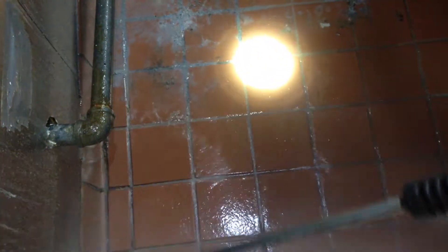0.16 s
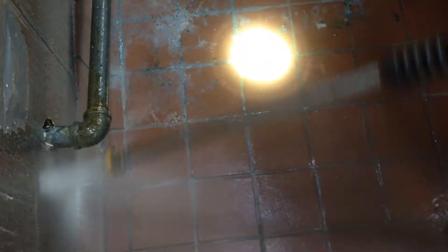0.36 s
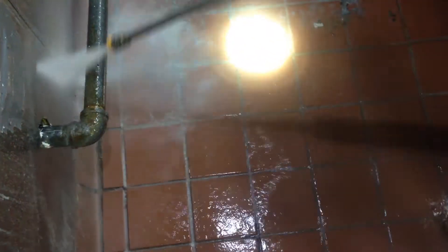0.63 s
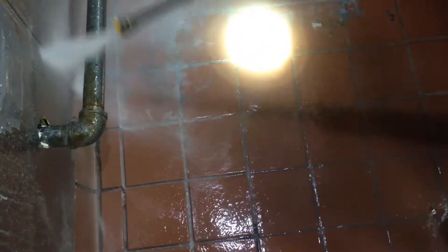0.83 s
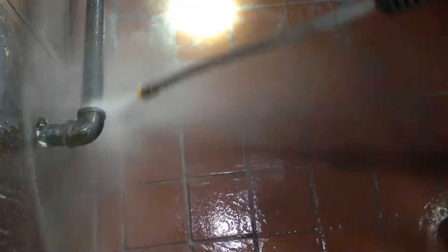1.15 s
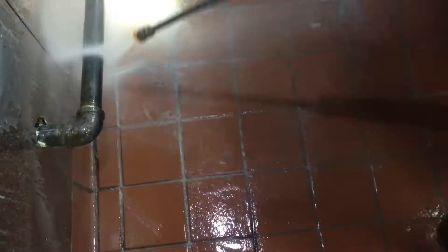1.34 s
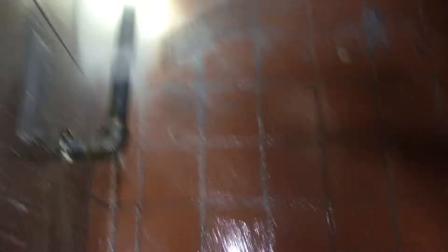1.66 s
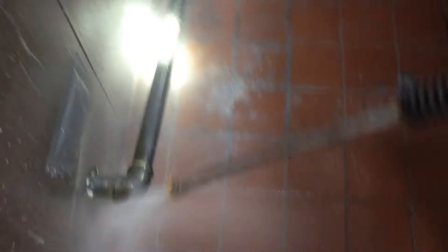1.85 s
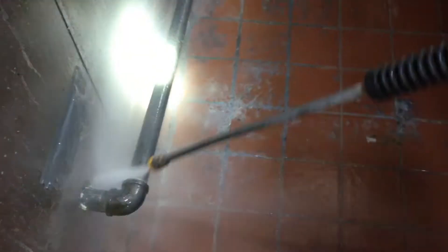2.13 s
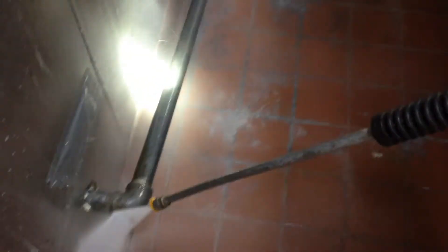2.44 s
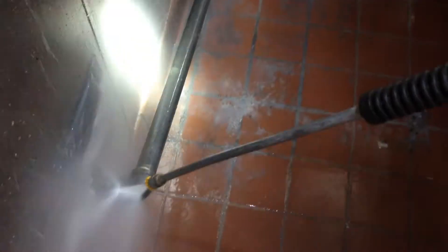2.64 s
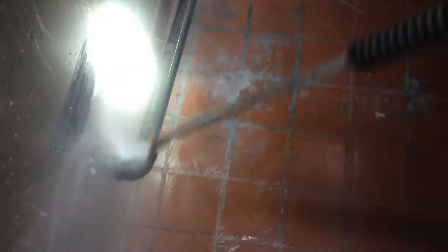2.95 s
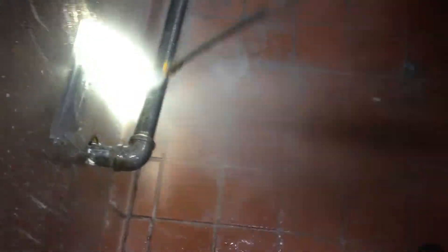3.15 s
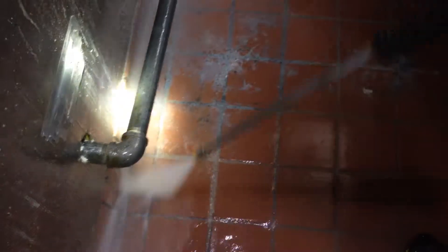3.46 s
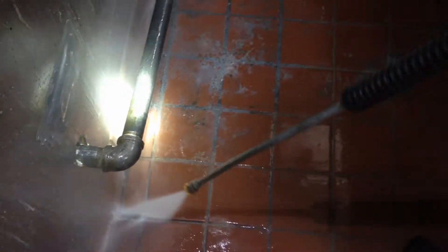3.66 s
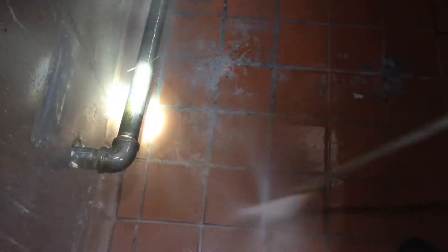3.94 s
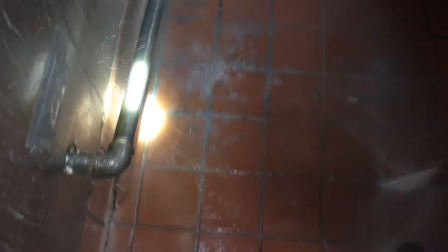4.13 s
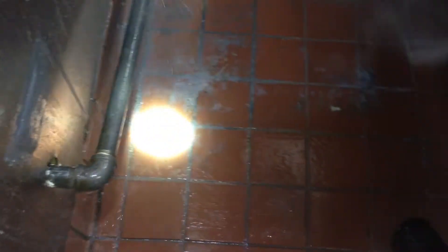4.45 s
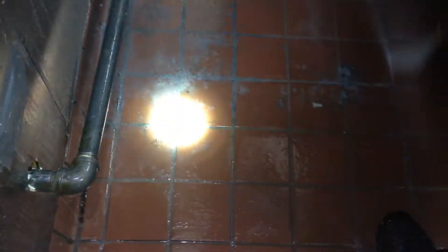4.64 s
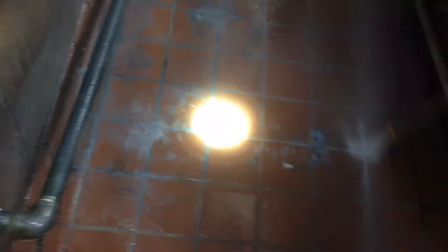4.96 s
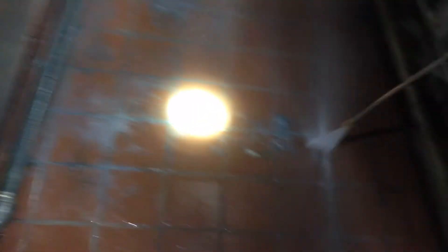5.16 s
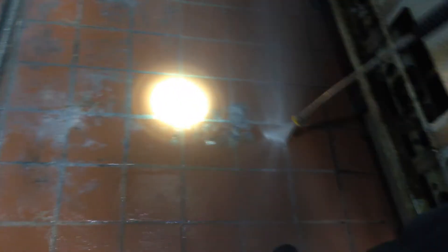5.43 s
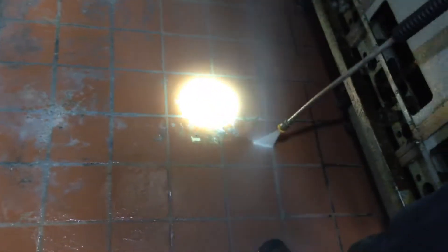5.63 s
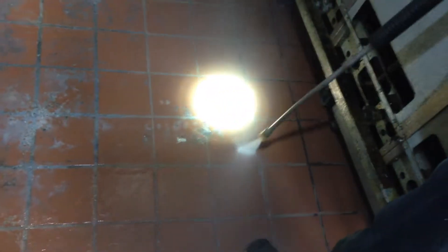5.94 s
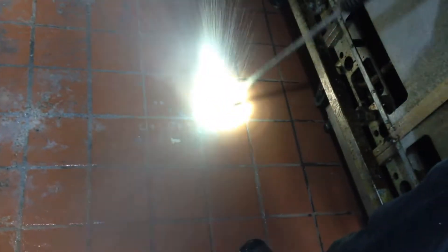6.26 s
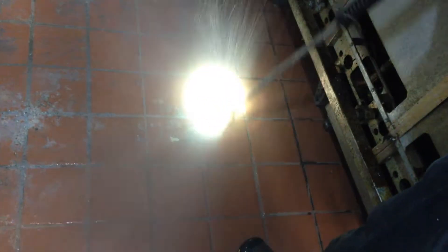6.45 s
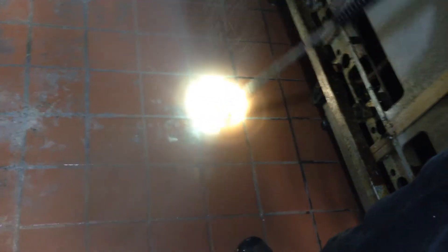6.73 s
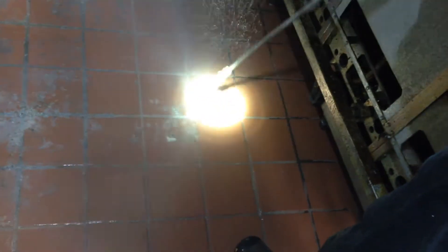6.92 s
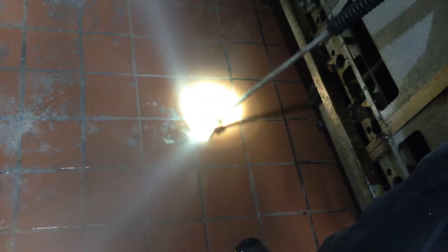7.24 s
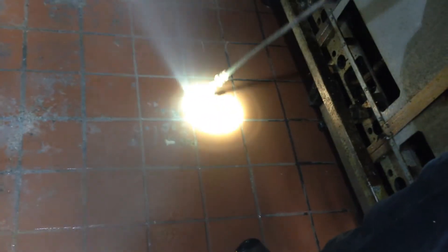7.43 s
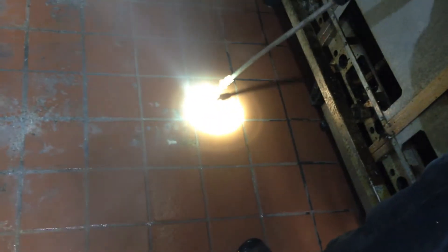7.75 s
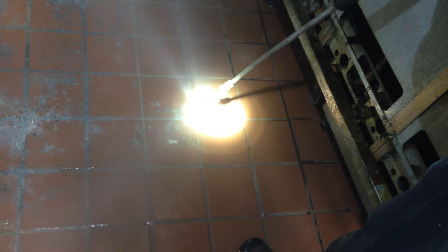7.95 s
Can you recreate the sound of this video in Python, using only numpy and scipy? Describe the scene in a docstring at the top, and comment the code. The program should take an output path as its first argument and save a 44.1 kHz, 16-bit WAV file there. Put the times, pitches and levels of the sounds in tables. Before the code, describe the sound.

A pressure washer jet roars and hisses into a steel-walled corner, then sweeps onto open tiles, thinner and hissier, over a faint motor hum.

```python
"""A fan jet from a pressure washer first digs into the corner at a steel wall: the impact roars and hisses,
the wall throws the hiss back a moment later, spray and mist sizzle on top, and a pump hums underneath.
Pitched bands of noise briefly swell within the jet, puffs of mist burst and gusts thud on the microphone.
Then it sweeps out on the open tiles: the roar sinks, the wall's echo comes later and the mist grows stronger.
The jet is flickering coloured noise with a sliding echo, in a hard room; both channels are the same."""
import sys
import numpy as np
from scipy import signal
from scipy.fft import rfft, irfft, next_fast_len
from scipy.io import wavfile
from scipy.ndimage import map_coordinates

SR = 44100
rng = np.random.default_rng(int(sys.argv[2]) if len(sys.argv) > 2 else 0)


def wav_record(signal):
    """Record a signal, one row per channel, as 16-bit PCM in the file named by sys.argv[1]."""
    frames = np.transpose(np.atleast_2d(signal))
    bounded = np.clip(frames, -1, 1)
    # unit amplitude maps onto the largest positive 16-bit level
    quanta = np.round(bounded * 32767).astype(np.int16)
    wavfile.write(sys.argv[1], SR, quanta)


N = 356769

SIZE = next_fast_len(N + SR)     # transform length, with a second or more to spare
HZ = np.maximum(np.arange(SIZE // 2 + 1) * SR / SIZE, 1)


def from_db(db):
    """Decibels to gain."""
    return 10 ** (np.asarray(db) / 20)


def rms_one(x):
    """Scale to rms 1."""
    return x / np.sqrt(np.mean(x ** 2) + 1e-20)


def in_time(rows):
    """Table columns as sample-by-sample curves."""
    s, *columns = np.transpose(rows)
    return [np.interp(np.arange(N) / SR, s, column) for column in columns]


def response(points):
    """A table of Hz and dB as gains on the frequency grid."""
    hz, db = np.transpose(points)
    return from_db(np.interp(np.log(HZ), np.log(hz), db))


def filtered(x, gains):
    """Apply gains on the frequency grid."""
    return irfft(rfft(x, SIZE) * gains, SIZE)[..., :N]


def drift(rate):
    """Slow random curve of rms about 1: coarse noise through a double one-pole low-pass at rate Hz."""
    step = 40                                # samples between the coarse points
    r = np.exp(-2 * np.pi * rate * step / SR)
    coarse = rng.standard_normal(N // step + 2002)
    slow = signal.lfilter([1], [1, -2 * r, r * r], coarse)[2000:]     # skip the filter's start
    return np.interp(np.arange(N) / step, np.arange(len(slow)), rms_one(slow))


def turbulence(spectrum, shared_db, patchy_db, rate):
    """Broken water as coloured noise, in overlapping bands that flicker partly together, partly alone; rms 1."""
    hz = np.array(spectrum)[:, 0]
    inside = (HZ > hz[0]) & (HZ < hz[-1])
    noise = rfft(rng.standard_normal(SIZE)) * response(spectrum) * inside
    out, together = 0, shared_db * drift(rate)
    # band centres in octaves, half an octave apart
    for centre in np.arange(np.floor(np.log2(hz[0])), np.ceil(np.log2(hz[-1])) + .1, .5):
        band = np.clip(1 - 2 * np.abs(np.log2(HZ) - centre), 0, 1)      # triangles that sum to 1
        flicker_db = together + patchy_db * drift(rate)
        out = out + irfft(noise * band, SIZE)[:N] * from_db(flicker_db)
    return rms_one(out)


def water_sheet(roar_db, puff_db):
    """Low rumble of the water sheet, which follows part of the roar's swing and is stirred by each puff."""
    # Colour of the sheet. Each row: frequency in Hz, relative level in dB.
    sheet_colour = [(18, -32), (35, -7), (55, -5), (110, -1), (160, -4), (230, -7), (400, -20)]
    base_db, roar_share, puff_share = -41, 0.31, .4
    swing_db = roar_db - roar_db.mean()
    level_db = base_db + roar_share * swing_db + puff_share * puff_db
    return from_db(level_db) * turbulence(sheet_colour, shared_db=2.0, patchy_db=1.5, rate=5.1)


def impact_roar(roar_db, dip_db):
    """Low-mid roar of the jet's impact, swelling where it digs into the corner."""
    # Colour of the roar. Each row: frequency in Hz, relative level in dB.
    roar_colour = [(150, -24), (230, -11.5), (300, -5), (450, 0), (700, -4), (900, 1), (1300, -16),
                   (2000, -21)]
    level_db = roar_db + 0.93 * dip_db       # takes nearly all of each falter
    return from_db(level_db) * turbulence(roar_colour, shared_db=1.27, patchy_db=1.2, rate=15)


def impact_splash(splash_db, dip_db):
    """Mid-range splash that carries the force of the impact."""
    # Colour of the splash. Each row: frequency in Hz, relative level in dB.
    splash_colour = [(200, -13), (400, -23), (600, -4.5), (800, -1.5), (1500, 2), (2400, 3), (3000, -6),
                     (3800, -4.5)]
    return from_db(splash_db + dip_db) * turbulence(splash_colour, shared_db=1.05, patchy_db=1.08, rate=21)


def impact_hiss(hiss_db, dip_db):
    """Hiss of the impact, a band of upper-mid noise."""
    # Colour of the hiss. Each row: frequency in Hz, relative level in dB.
    hiss_colour = [(2000, -43), (2600, -1.5), (3200, 1), (4300, 2.5), (5000, -1.5), (6000, -15),
                   (7500, -51)]
    return from_db(hiss_db + dip_db) * turbulence(hiss_colour, shared_db=0.59, patchy_db=0.88, rate=14)


def flying_spray(spray_db, puff_db):
    """Sizzle of the spray in the treble, lifted a little by each puff."""
    # Colour of the spray. Each row: frequency in Hz, relative level in dB.
    spray_colour = [(4500, -10), (5500, 6), (6200, 2), (7500, 1.5), (9000, -4), (11000, -15)]
    level_db = spray_db + 0.32 * puff_db
    return from_db(level_db) * turbulence(spray_colour, shared_db=0.57, patchy_db=0.85, rate=27)


def fine_mist(mist_db, puff_db):
    """Airy top treble of the mist, which takes each puff in full."""
    # Colour of the mist. Each row: frequency in Hz, relative level in dB.
    mist_colour = [(8000, -11), (9800, -4.5), (12000, -5.5), (14000, -10), (15500, -9)]
    return from_db(mist_db + puff_db) * turbulence(mist_colour, shared_db=0.6, patchy_db=0.7, rate=13)


def off_the_wall(x):
    """Direct sound plus a late copy: a comb that slides as the jet leaves the wall."""
    # The wall's echo of the impact. Each row: time in seconds, extra path in ms, strength in dB.
    wall = [(0, 0.15, -21), (.8, 0.18, -16), (1.3, 0.17, -10.5), (1.8, 0.18, -10.5), (2.05, 0.15, -23),
            (2.8, 0.11, -22), (3.3, 0.15, -12), (3.7, 0.057, -35), (3.83, 0.13, -17), (3.96, 0.38, -8),
            (4.03, 0.53, -8), (4.26, 0.96, -11), (4.75, 1.01, -9.5), (6.05, 1.07, -14), (6.3, 1, -14),
            (7, 0.9, -10.5), (8.09, 0.95, -12)]
    wall_cut_hz, sharp_path_ms = 2600, 0.61
    path_ms, echo_db = in_time(wall)
    late = map_coordinates(x, [np.arange(N) - path_ms * SR / 1000], order=3, mode="nearest")
    dull = filtered(late, 1 / np.sqrt(1 + (HZ / wall_cut_hz) ** 4))
    sharp = np.exp(-(path_ms / sharp_path_ms) ** 2)      # away from the wall the wide fan blurs the echo's treble
    echo = from_db(echo_db)
    return (x + echo * (sharp * late + (1 - sharp) * dull)) / np.sqrt(1 + echo ** 2)


def room(x):
    """Short diffuse tails that take turns as the jet moves about; the standing waves lift their pitches."""
    # Standing waves of the room. Each row: frequency in Hz, width in Hz, lift in dB.
    room_modes = [(120, 33, 3), (150.6, 24, 4), (302.4, 16, 5.5), (420, 27, 2), (523, 22, 4.5),
                  (620, 17, 4), (832, 31, 3.5), (870, 17, 3), (939, 54, 1), (1043, 60, 1.5), (1400, 70, 1),
                  (1770, 22, 1), (2460, 42, 3)]
    t60_s, tail_db, damp_hz = 0.22, -8, 2800
    t = np.arange(SR // 2) / SR
    tails = rng.standard_normal((4, len(t))) * from_db(-60 * t / t60_s) * (t > .003)
    tails = tails / np.sqrt(np.sum(tails ** 2, axis=1, keepdims=True))
    turns = np.array([drift(0.66) for tail in tails])
    turns = turns / np.sqrt(np.sum(turns ** 2, axis=0))
    damp = from_db(tail_db) / np.sqrt(1 + (HZ / damp_hz) ** 2)      # damp air takes the treble off the tails
    heard = x + np.sum(filtered(x * turns, rfft(tails, SIZE) * damp), axis=0)
    lift_db = sum(db / (1 + (2 * (HZ - hz) / width) ** 2) for hz, width, db in room_modes)
    return filtered(heard, from_db(lift_db))


def pump():
    """Motor hum: slightly wavering partials, each roughened by noise close around it."""
    # Partials of the pump motor. Each row: frequency in Hz, rms level of the sine in dB.
    hum = [(59.2, -46), (118.4, -57.5), (177.6, -54.5)]
    skirt_db, skirt_hz = -1.5, 12.5          # noise level relative to its sine, half-width of the noise
    wavering_s, out = np.cumsum(1 + 0.0067 * drift(5.7)) / SR, 0
    for hz, db in hum:
        skirt = rms_one(filtered(rng.standard_normal(N), np.exp(-((HZ - hz) / skirt_hz) ** 2)))
        sine = np.sqrt(2) * np.sin(2 * np.pi * hz * wavering_s)
        out = out + from_db(db) * (sine + from_db(skirt_db) * skirt)
    return out


def pitched_swells():
    """Bands of noise that briefly swell and fade at a set pitch within the jet's noise."""
    # Pitched swells. Each row: middle in seconds, length in seconds, pitch in Hz, level in dB.
    swells = [(.25, 0.92, 2390, -27.5), (0.557, 0.13, 1110, -21), (1.65, 0.23, 1640, -27),
              (2.046, 0.24, 2620, -25), (2.25, .25, 1510, -22.5), (2.84, 0.36, 2570, -25.5),
              (2.88, 0.18, 876, -20.5), (3.3, 0.97, 1490, -30), (3.95, 0.14, 2800, -24),
              (4.824, 0.24, 2050, -26.5), (4.847, 0.44, 990, -31.5), (5.402, 0.8, 1990, -30),
              (5.4, 0.75, 1490, -31.5), (5.6, .97, 4900, -31), (6.102, 0.32, 3940, -28),
              (6.62, 0.67, 3280, -25), (7.3, 0.38, 3250, -28)]
    t, out, noise = np.arange(N) / SR, 0, rfft(rng.standard_normal(SIZE))
    for s, length, hz, db in swells:
        width_hz = 84 + .05 * hz             # a base plus a share of the pitch
        band = irfft(noise * np.exp(-((HZ - hz) / width_hz) ** 2), SIZE)[:N]
        envelope = np.exp(-(2 * (t - s) / length) ** 2)
        out = out + from_db(db) * envelope * rms_one(band)
    return out


def crossings():
    """The jet crosses a pipe or a tile edge: mist puffs up and the impact mostly falters, as brief dB bumps."""
    # Crossings. Each row: time in seconds, puff of mist in dB, change of the impact in dB.
    crossed = [(0.51, 7, 1), (1.0, 4, -2.5), (1.2, 3, -0.5), (1.29, 0, -1.5), (1.76, 1, -0.5),
               (1.85, 5, 0.5), (2.15, 5, -3), (2.36, 4, 1.5), (2.43, 0, -2.5), (2.6, .5, -1),
               (2.72, 1, -2.5), (2.77, 2, 1.5), (2.99, 5, -5), (3.86, 3, -0.5), (5.2, 2, 2)]
    puff_s, dip_s = 0.032, 0.028
    t = np.arange(N) / SR
    puff_db = sum(puff * np.exp(-((t - s) / puff_s) ** 2) for s, puff, dip in crossed)
    dip_db = sum(dip * np.exp(-((t - s) / dip_s) ** 2) for s, puff, dip in crossed)
    return puff_db, dip_db


def thumps():
    """Gusts of spray thud on the microphone, each a short lump of low noise."""
    # Thuds. Each row: start in seconds, nominal peak in dB.
    gusts = [(1.0, -16), (1.831, -19), (2.179, -22), (3.014, -15.5), (3.449, -16), (4.519, -30),
             (7.929, -26)]
    crest_db = 12                            # assumed peak of a noise lump over its rms
    t, envelope = np.arange(N) / SR, np.zeros(N)
    for s, peak_db in gusts:
        # fullest 20 ms after the start
        envelope += from_db(peak_db - crest_db) * np.exp(-((t - s - .02) / 0.032) ** 2)
    low_colour = response([(35, -40), (55, -5), (140, 3), (300, -32), (600, -60)])
    return envelope * rms_one(filtered(rng.standard_normal(N), low_colour))


def scene():
    """Impact and spray pass the wall and the room; hum and thuds join at the microphone."""
    # The jet's impact. Each row: time in seconds, splash level in dB, roar level in dB.
    jet = [(0, -17, -23), (.22, -21.5, -26.5), (.45, -20.5, -22.5), (.55, -16, -20), (.65, -19, -23),
           (.9, -16.5, -21.5), (1.08, -16, -24.5), (1.35, -17, -22.5), (1.73, -15, -21.5), (1.85, -18, -26),
           (2.05, -17, -22), (2.3, -20, -26), (2.55, -17, -25), (2.65, -20, -31.5), (2.85, -18, -23.5),
           (3.1, -17, -24.5), (3.36, -17.5, -25.5), (3.46, -15.5, -20.5), (3.63, -21.5, -18),
           (3.9, -20.5, -26.5), (4.05, -20.5, -33), (4.45, -20, -35.5), (4.64, -22, -29),
           (4.82, -19.5, -36.5), (5.15, -20.5, -33.5), (5.3, -19, -38), (5.8, -20, -44.5), (6.4, -22, -36),
           (6.7, -20.5, -45.5), (7.07, -21, -33.5), (8.09, -19.5, -36)]
    # The treble. Each row: time in seconds, hiss level in dB, spray level in dB, mist level in dB.
    treble = [(0, -20.5, -30.5, -45), (.2, -24.5, -33, -48), (.47, -21, -29.5, -46),
              (1.1, -21.5, -31.5, -43), (1.7, -22, -30, -43), (1.95, -21.5, -31.5, -47),
              (2.3, -21.5, -32.5, -44), (2.55, -22.5, -30, -45), (2.68, -22.5, -32.5, -42),
              (2.86, -18.5, -30.5, -47), (3.1, -21.5, -34, -46), (3.36, -19.5, -33.5, -40.5),
              (3.45, -20, -33.5, -49), (3.77, -22, -33, -49), (3.86, -17, -26, -46), (4, -19.5, -34, -47.5),
              (4.37, -23.5, -32.5, -38.5), (4.62, -23.5, -33, -50), (4.8, -22.5, -32.5, -37.5),
              (5.2, -21, -31.5, -40.5), (5.4, -22.5, -34, -38.5), (6.1, -21, -35.5, -40),
              (6.35, -23.5, -34, -40), (6.65, -22, -35, -41.5), (7.3, -22, -32, -37),
              (8.09, -22, -33, -39.5)]
    splash_db, roar_db = in_time(jet)
    hiss_db, spray_db, mist_db = in_time(treble)
    puff_db, dip_db = crossings()
    rumble = water_sheet(roar_db, puff_db)
    roar = impact_roar(roar_db, dip_db)
    splash = impact_splash(splash_db, dip_db)
    hiss = impact_hiss(hiss_db, dip_db)
    spray = flying_spray(spray_db, puff_db)
    mist = fine_mist(mist_db, puff_db)
    impact = rumble + roar + off_the_wall(splash + hiss + spray) + pitched_swells()
    heard = room(impact + mist) + pump() + thumps()
    return np.array([heard, heard])


def record(dry):
    """Fixed tone colour, softly rounded peaks, the top cut off."""
    # Fixed tone colour: less bass, a shallow dip below 3 kHz, then a sudden step up.
    # Each row: frequency in Hz, gain in dB.
    tone_colour = [(20, -10), (45, -0.5), (2450, -1), (2600, -0.5), (2800, -2.5), (3040, -3), (3100, 1)]
    cutoff_hz = 15180
    soft = 1.444 * np.tanh(filtered(dry, response(tone_colour)) / 1.561)
    # order 16, ripple .5 dB, stop band 100 dB down
    top_cut = signal.ellip(16, .5, 100, cutoff_hz, fs=SR, output="sos")
    return signal.sosfilt(top_cut, soft)


dry = scene()
out = record(dry)
wav_record(out)
```